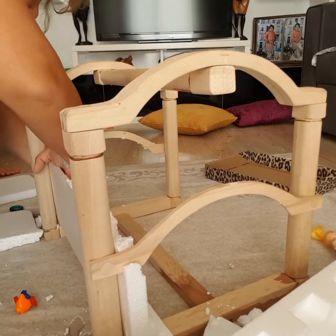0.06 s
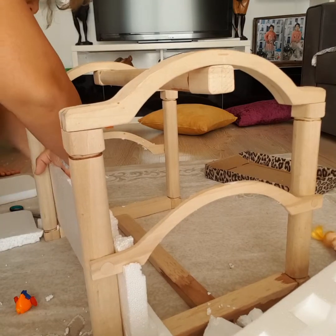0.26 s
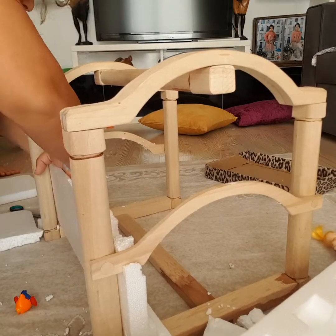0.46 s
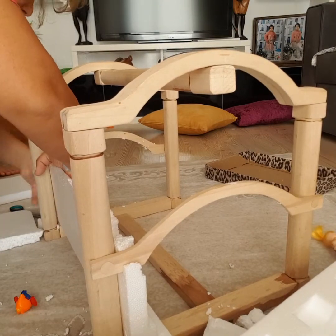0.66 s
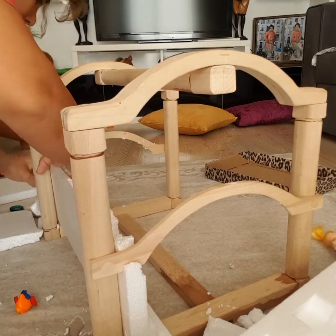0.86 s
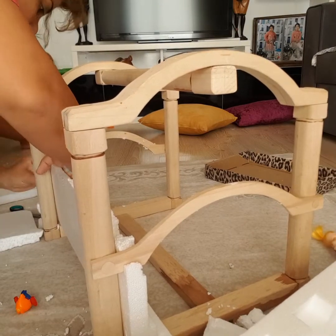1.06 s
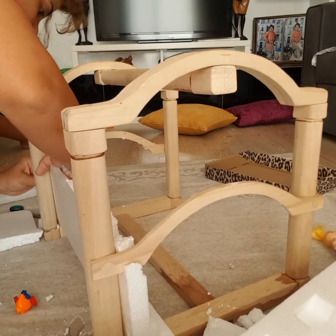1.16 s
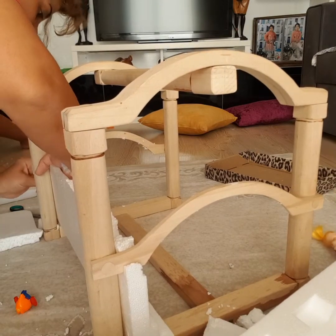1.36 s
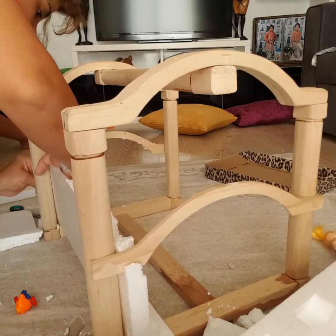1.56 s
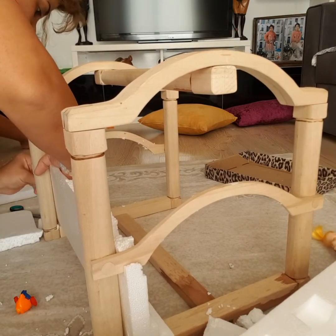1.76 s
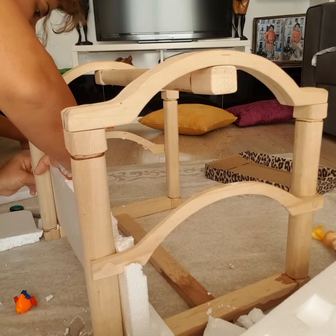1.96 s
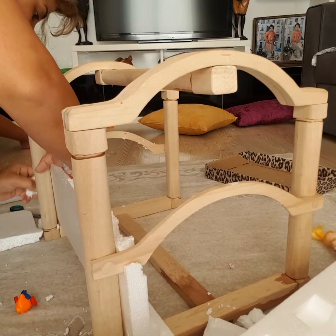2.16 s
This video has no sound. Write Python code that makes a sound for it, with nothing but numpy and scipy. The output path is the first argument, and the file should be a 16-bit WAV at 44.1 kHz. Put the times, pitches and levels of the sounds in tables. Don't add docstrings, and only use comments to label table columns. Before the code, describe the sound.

Foam sheet forced into a wooden frame: a fast stuttering creak, one loud crunchy crack with a woody knock, then fainter rubs, snaps and light knocks in a living room, recorded close by a phone.

```python
import sys
import numpy as np
from scipy import signal
from scipy.fft import rfft, irfft
from scipy.io import wavfile

SR = 44100
rng = np.random.default_rng(int(sys.argv[2]) if len(sys.argv) > 2 else 0)


def ratio(d):
    e = np.asarray(d, float) / 20
    return 10 ** e


def transcribe(signal):
    frames = np.atleast_2d(signal).T
    limited = np.clip(frames, -1, 1)
    pcm = np.round(limited * 32767).astype(np.int16)
    wavfile.write(sys.argv[1], SR, pcm)


N = 97020
TIME_S = np.arange(N) / SR

# [pitch_hz, level_db per Hz]
ROOM_TONE = [(30, -18.5), (60, -6.5), (200, -13), (500, -22.5), (1200, -29.5), (6000, -38.5), (9000, -36.5),
             (15500, -16.5)]
# [pitch_hz, level_db]
APPLIANCE_HUM = [(129, -74), (247, -81)]
# [start_s, peak_db]
SLIPS = [(0.0059, -26), (0.0169, -26), (0.0256, -22), (0.0334, -26), (0.0399, -26), (0.0468, -25),
         (0.0544, -26), (0.0607, -23), (.0685, -30), (.077, -29), (0.0839, -27), (0.0898, -25),
         (0.0978, -25), (0.1082, -25), (0.1252, -24), (0.1378, -25), (0.1409, -26), (0.1469, -25),
         (0.158, -26), (0.1775, -26), (0.1872, -24), (0.1977, -26), (0.2074, -25)]
# [pitch_hz, width_hz, level_db]
CREAK_SHEET = [(1600, 820, -11), (3045, 1100, -5), (7100, 880, -4)]
# [pitch_hz, width_hz, level_db]
CREAK_CELLS = [(9330, 550, 0.5), (11300, 1700, -8.5), (12960, 960, 1), (15000, 1600, -5)]
# [start_s, hold_s, rise_s, level_db, treble_db above level]
RUBS = [(.005, 0.17, 0.0057, -49, 3.5), (0.242, 0.0093, 0.031, -37, 3.5), (.257, 0.019, 0.0096, -32, 1.5),
        (0.282, .025, 0.017, -39.5, 1), (0.466, 0.032, 0.027, -59.5, 15.5),
        (0.51, 0.011, 0.0017, -48.5, 10.5), (0.53, 0.048, 0.035, -54, 5.5), (0.591, 0.028, 0.016, -49, 0.5),
        (0.771, 0.008, 0.021, -78, 18.5), (0.848, 0.032, 0.013, -59.5, 5.5),
        (0.904, 0.011, 0.026, -55.5, 5.5), (1.014, 0.023, 0.019, -60.5, 7), (1.066, 0.019, 0.019, -73, 3),
        (1.162, 0.0067, 0.019, -58, 7), (1.297, 0.096, 0.015, -86, 16.5), (0.687, 0.14, 0.029, -81, -0.5),
        (2.08, 0.14, 0.035, -96, 6), (1.493, 0.018, 0.038, -87.5, 20.5), (1.793, 0.037, 0.045, -78.5, 18),
        (1.865, 0.029, 0.015, -49.5, 5), (1.945, 0.013, 0.048, -56.5, 6), (1.989, 0.023, 0.012, -41.5, 3.5),
        (2.024, 0.005, 0.0088, -82, 5), (2.2, .02, 0.054, -50, 1)]
# [pitch_hz, width_hz, level_db]
SHEET_RINGS = [(1374, 670, 5), (2500, 1400, 7), (3960, 5100, -5)]
# [pitch_hz, width_hz, level_db]
CELL_RINGS = [(6300, 3040, 5.5), (10540, 1660, 9.5), (12800, 3200, 7), (15800, 1800, -0.5)]
# [start_s, hold_s, rise_s, groan_db, thud_db]
SHOVES = [(0.001, 0.017, .01, -59.5, -60.5), (0.108, 0.025, 0.039, -49.5, -59),
          (0.192, 0.087, 0.027, -55, -84), (0.255, 0.028, 0.014, -35, -37.5),
          (0.363, 0.027, 0.091, -54, -52), (0.531, 0.018, 0.063, -54.5, -60),
          (0.591, 0.0085, 0.0068, -50, -57.5), (0.767, 0.0067, 0.1, -63.5, -61.5),
          (0.848, 0.069, 0.0052, -65.5, -73.5), (1.016, 0.086, 0.043, -62, -68),
          (1.174, 0.037, 0.056, -55.5, -62), (1.864, 0.021, 0.0091, -50.5, -64),
          (1.991, 0.058, 0.078, -53.5, -65.5), (2.048, 0.016, .02, -70, -54.5),
          (2.2, 0.024, 0.078, -58.5, -75)]
# [pitch_hz, width_hz, level_db]
WOOD_RINGS = [(243, 93, -2), (532.5, 240, -3.5), (1080, 250, -13)]
# [pitch_hz, width_hz, level_db]
FLOOR_RINGS = [(57.4, 14, -2), (132, 100, -5)]
KNOCK_TIMES = [.256, .263, .135, .592, .592, 1.186, 1.183, 1.184, 1.8675, 1.8675, 1.873, 1.988, 2.1455,
               1.184, 1.184, 1.196, .256, .262]
# [level_db, pitch_hz, fade_60db_s]
KNOCK_RINGS = [(-22.5, 268, 0.07), (-20.5, 80, 0.11), (-50.5, 42, 0.48), (-42.5, 268, 0.11),
               (-27.5, 1280, 0.011), (-40, 430, 0.14), (-40.5, 251, 0.038), (-54, 830, 0.034),
               (-32, 486, 0.044), (-28, 616, 0.028), (-49, 86, 0.5), (-30.5, 647, 0.018), (-47, 490, 0.056),
               (-60, 1000, 0.026), (-48.5, 1000, 0.032), (-52, 470, 0.094), (-27.5, 1430, 0.11),
               (-28.5, 2700, .08)]
# [start_s, hold_s, pitch_hz, level_db]
SQUEAKS = [(.895, .025, 3450, -52), (.895, .012, 6900, -51), (.511, .005, 6500, -34),
           (.53, .008, 6900, -40), (.591, .004, 3600, -37), (.2555, .003, 2800, -19),
           (.272, .006, 7100, -26), (.1, .13, 3150, -49), (.255, .002, 6900, -24), (.256, .002, 10700, -26),
           (.268, .012, 13200, -32), (.5925, .002, 10400, -36), (1.8675, .003, 2800, -36),
           (.908, .012, 4400, -59), (1.155, .02, 2500, -58), (.515, .03, 4500, -46), (.26, .025, 4300, -36),
           (.262, .03, 2350, -36)]
SNAP_TIMES = [.2547, .2685, .2755, .4035, .4595, .4718, .5085, .5165, .5921, .7408, .834, .8486, 1.0215,
              1.394, 1.4472, 1.489, 1.79, 1.8348, 1.8668, 1.876, 1.977, 1.99, 2.018, 2.1446, .4685, .4795,
              .4895, .498, .5097, .5115, .514, .5297, .2805, .288, 1.838, 1.8255, 1.869, .586, .2245]
# [peak_db, treble_db above peak, length_s]
SNAPS = [(-7.5, 1.5, 0.0044), (-19, 3, 0.002), (-20, -2, 0.0034), (-28, 1, 0.0059), (-38, 15, 0.0036),
         (-28, 14, 0.002), (-31.5, 26.5, 0.002), (-26, 17, 0.0013), (-21.5, 7, 0.0051), (-56.5, 18, 0.0051),
         (-42, 9, 0.0032), (-38, 11.5, 0.0028), (-30, -10, 0.0029), (-57, -9, 0.0043), (-58, 11.5, 0.0046),
         (-56.5, 17.5, 0.0051), (-57.5, 21.5, 0.0031), (-34, 12, 0.0043), (-16.5, -4.5, 0.0039),
         (-26.5, 6.5, 0.0035), (-32, 9, 0.0047), (-27.5, 9, 0.0045), (-26.5, 10, 0.007),
         (-27.5, -4.5, 0.007), (-46, 9.5, 0.0039), (-50, 21, 0.0027), (-51, 27, 0.004), (-33, 6, 0.0059),
         (-23, 23.5, 0.0013), (-34, 21, 0.0021), (-31, 26, .002), (-22, 18.5, 0.0013), (-19.5, 1, 0.0035),
         (-24, 0, 0.0032), (-32, 9, 0.0038), (-49, 8, 0.0043), (-34, 3, 0.0021), (-40, 5.5, .002),
         (-38.5, 17.5, 0.0034)]

RISE_DB = 13
RUB_FALL_DB_PER_S, SHOVE_FALL_DB_PER_S, SQUEAK_FALL_DB_PER_S = 352.5, 279, 1200
GRAINS_PER_S, GRAIN_SPREAD_DB, FLUTTER_DB, FLUTTER_HZ = 9000, 4.5, 1.32, 80
SLIP_DB, SLIP_S, SLIP_RISE_S = 7, 0.002, 0.0006
SLIP_TREBLE_DB, TREBLE_SAG_DB_PER_S = -3.5, 46.5
SHEET_START_DB, SHEET_GROW_DB_PER_S = -3.5, 27.5
SNAP_DB, SNAP_RISE_S = -17.5, 0.00084
SQUEAK_WIDTH_HZ, SQUEAK_RISE_S = 900, 0.003
ROOM_TONE_DB, HUM_WIDTH_HZ = -68.5, 4.2
ROOM_T60_S, ROOM_DB, WALL_CUT_HZ = 0.32, -12.5, 10800
WIDTH, WIDE_HZ, TREBLE_LEFT, TREBLE_LEFT_HZ = 0.81, 1000, 0.47, 2980
LEFT_DB, LEFT_LAG_S, THUD_LEFT, THUD_WIDTH = -0.39, 0.00007, 0.27, 0.3


def rms_one(x):
    return x / np.sqrt(np.mean(x ** 2) + 1e-20)


def high_pass(x, order, hz):
    return signal.sosfilt(signal.butter(order, hz, "high", fs=SR, output="sos"), x)


def body(x, peaks):
    out = 0
    for k, (hz, width_hz, db) in enumerate(peaks):
        r = np.exp(-np.pi * width_hz / SR)
        feedback = [1, -2 * r * np.cos(2 * np.pi * hz / SR), r * r]
        ring = signal.lfilter([1 - r * r, 0, r * r - 1], feedback, x)
        out = out + (-1) ** k * ratio(db) * ring
    return out


def stroke(start, hold, rise, fall_db_per_s):
    t = TIME_S - start
    swell_db = RISE_DB * np.minimum(t, 0) / max(rise, 1e-4)
    return ratio(swell_db - fall_db_per_s * np.maximum(t - hold, 0))


def burst(start, db, length, rise):
    age = np.maximum(TIME_S - start, 0)
    return ratio(db - 20 * age / max(length, 5e-4)) * np.minimum(age / rise, 1)


def spread(pair):
    side = WIDTH * high_pass(pair[1], 1, WIDE_HZ)
    side = side + TREBLE_LEFT * high_pass(pair[0], 1, TREBLE_LEFT_HZ)
    return np.array([pair[0] + side, pair[0] - side])


def quiet():
    hz = np.fft.rfftfreq(N, 1 / SR) + 1
    at_hz, db = np.transpose(ROOM_TONE)
    colour = ratio(np.interp(np.log(hz), np.log(at_hz), db))
    tone = irfft(rfft(rng.standard_normal((2, N))) * colour, N)
    hum = 0
    for pitch, level in APPLIANCE_HUM:
        narrow = body(rng.standard_normal(N), [(pitch, HUM_WIDTH_HZ, 0)])
        hum = hum + ratio(level - 2) * rms_one(narrow)
    return ratio(ROOM_TONE_DB) * spread(rms_one(tone)) + hum


def creaking():
    jerks = sum(burst(s, db + SLIP_DB, SLIP_S, SLIP_RISE_S) for s, db in SLIPS)
    drive = rng.choice([-1, 1], (2, N)) * jerks + 1e-18
    sag = ratio(SLIP_TREBLE_DB - TREBLE_SAG_DB_PER_S * TIME_S)
    grow = ratio(SHEET_START_DB + SHEET_GROW_DB_PER_S * np.minimum(TIME_S, 0.25))
    return grow * body(drive, CREAK_SHEET) + sag * body(drive, CREAK_CELLS)


def rubbing():
    sizes = ratio(GRAIN_SPREAD_DB * np.minimum(rng.exponential(1, (2, N)), 4))
    sizes = sizes * rng.choice([-1, 1], (2, N))
    grains = sizes * (rng.random((2, N)) < GRAINS_PER_S / SR)
    grains = high_pass(grains + 0.9 * rng.standard_normal((2, N)), 2, 540)
    r = np.exp(-2 * np.pi * FLUTTER_HZ / SR)
    wander = signal.lfilter([1], [1, -2 * r, r * r], rng.standard_normal((3, N)))
    flutter = ratio(FLUTTER_DB * rms_one(wander))
    low = high = 0
    for start, hold, rise, db, treble_db in RUBS:
        push = stroke(start, hold, rise, RUB_FALL_DB_PER_S)
        low = low + ratio(db) * push
        high = high + ratio(db + treble_db) * push
    sheet = low * flutter[0] * flutter[1] * rms_one(body(grains, SHEET_RINGS))
    return sheet + high * flutter[0] * flutter[2] * rms_one(body(grains, CELL_RINGS))


def frame():
    groan = rms_one(body(rng.standard_normal((2, N)), WOOD_RINGS))
    thud = rms_one(body(body(rng.standard_normal((2, N)), FLOOR_RINGS), FLOOR_RINGS))
    wood = low = 0
    for start, hold, rise, groan_db, thud_db in SHOVES:
        push = stroke(start, hold, rise, SHOVE_FALL_DB_PER_S)
        wood = wood + ratio(groan_db) * push * groan
        low = low + ratio(thud_db) * push * thud
    for start, (db, hz, t60) in zip(KNOCK_TIMES, KNOCK_RINGS):
        age = np.maximum(TIME_S - start, 0)
        ring = ratio(db - 60 * age / t60) * np.sin(2 * np.pi * hz * age)
        ring = ring * np.minimum(age * hz / 0.57, 1)
        if hz < 150:
            low = low + ring * [[1], [0]]
        else:
            wood = wood + ring * [[1], [0.4]]
    return wood, low


def squeaking():
    white, out = rng.standard_normal((2, N)), 0
    for start, hold, hz, db in SQUEAKS:
        peak = [(hz, SQUEAK_WIDTH_HZ, 0)]
        song = rms_one(body(body(white, peak), peak))
        out = out + ratio(db) * stroke(start, hold, SQUEAK_RISE_S, SQUEAK_FALL_DB_PER_S) * song
    return out


def snapping():
    low = high = 0
    for start, (db, treble_db, length) in zip(SNAP_TIMES, SNAPS):
        crack = burst(start, db + SNAP_DB, length, SNAP_RISE_S)
        low = low + crack
        high = high + ratio(treble_db) * crack
    white = rng.choice([-1, 1], (2, N))
    return 2 * body(white * low + 1e-18, SHEET_RINGS) + body(white * high + 1e-18, CELL_RINGS)


def room(x):
    age = np.arange(SR // 2) / SR
    fade = ratio(-60 * age / ROOM_T60_S) * np.minimum(age / 0.026, 1)
    tail = rng.standard_normal((2, len(age))) * fade
    tail = signal.sosfilt(signal.butter(2, [650, WALL_CUT_HZ], "band", fs=SR, output="sos"), tail)
    tail = tail / np.sqrt(np.sum(tail ** 2) / 2)
    return ratio(ROOM_DB) * spread(signal.fftconvolve(x[None], tail)[:, :N])


def scene():
    wood, (low, low_side) = frame()
    pair = creaking() + rubbing() + wood + squeaking() + snapping()
    deep = signal.butter(2, 100, "low", fs=SR, output="sos")
    lean = signal.sosfiltfilt(deep, THUD_LEFT * low + THUD_WIDTH * low_side)
    left, right = spread(pair) + room(pair[0]) + low + lean * [[1], [-1]]
    advance = np.exp(2j * np.pi * np.fft.rfftfreq(N, 1 / SR) * LEFT_LAG_S)
    early = irfft(rfft(left) * advance, N)
    return np.array([early * ratio(LEFT_DB), right * ratio(-LEFT_DB)]) + quiet()


def top_cut(x):
    return signal.sosfilt(signal.butter(12, 16850, fs=SR, output="sos"), x)


def record(dry):
    treble_cut = signal.ellip(12, 0.5, 45, 15900, fs=SR, output="sos")
    mix = signal.sosfilt(treble_cut, dry)
    return top_cut(mix)


dry = scene()
out = record(dry)
transcribe(out)
```